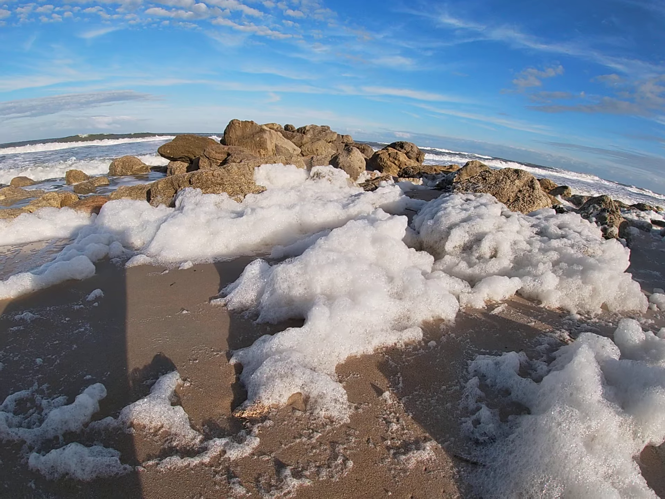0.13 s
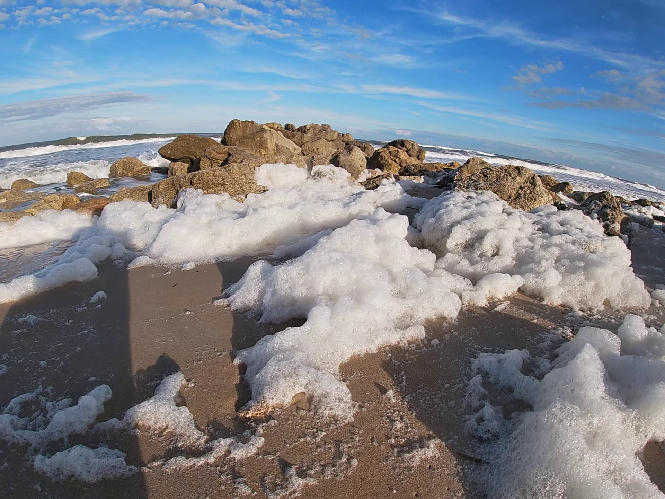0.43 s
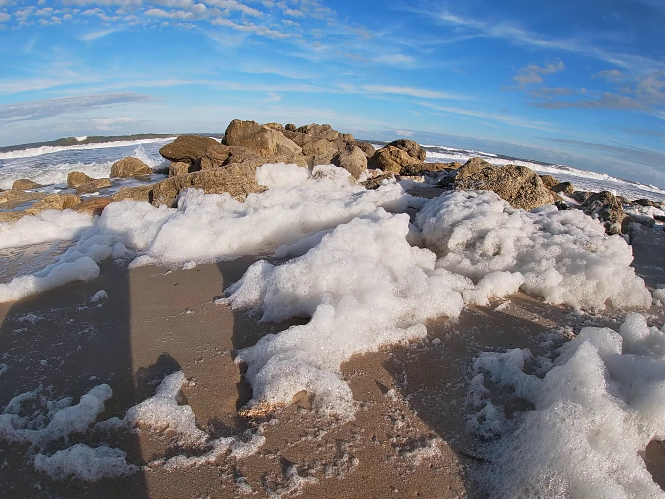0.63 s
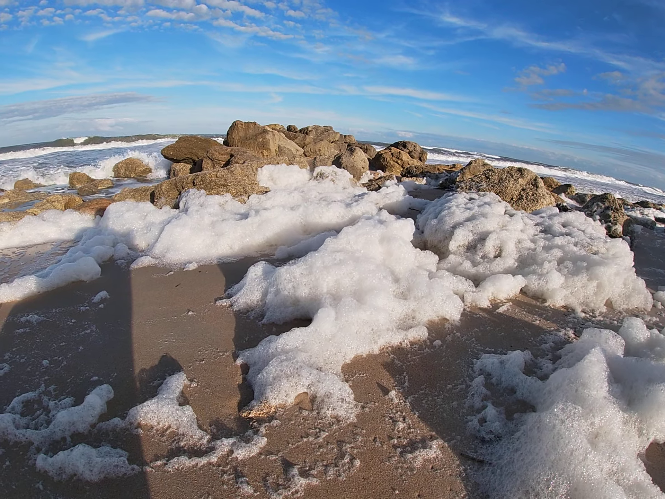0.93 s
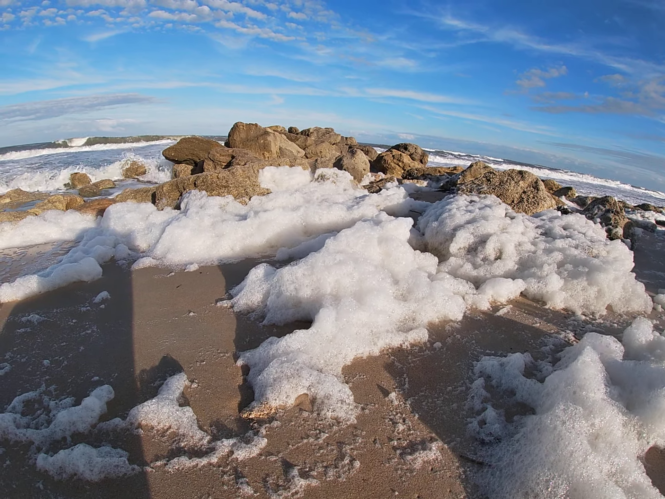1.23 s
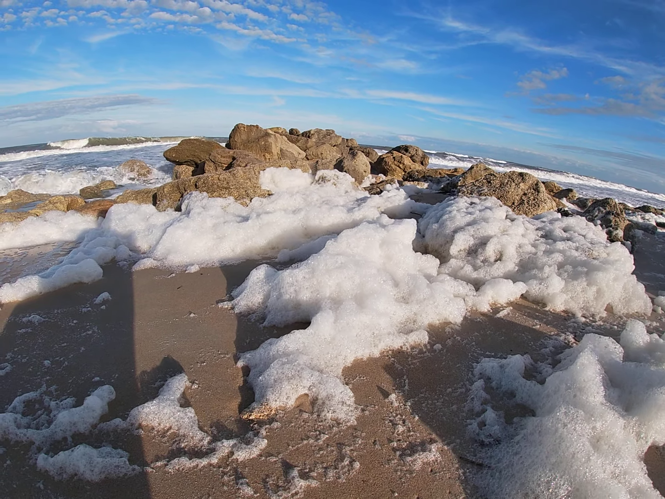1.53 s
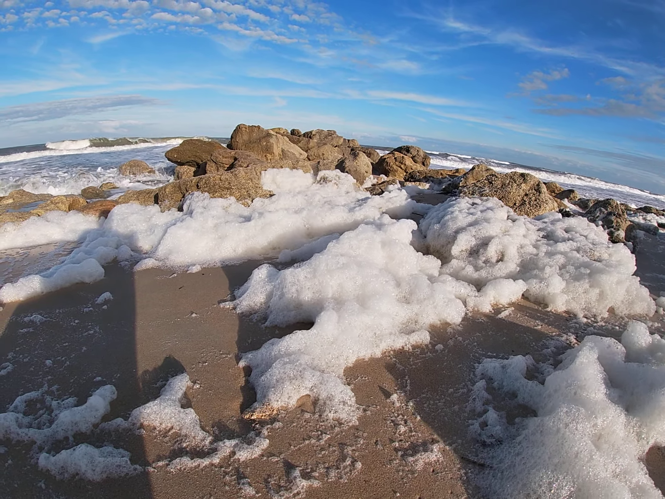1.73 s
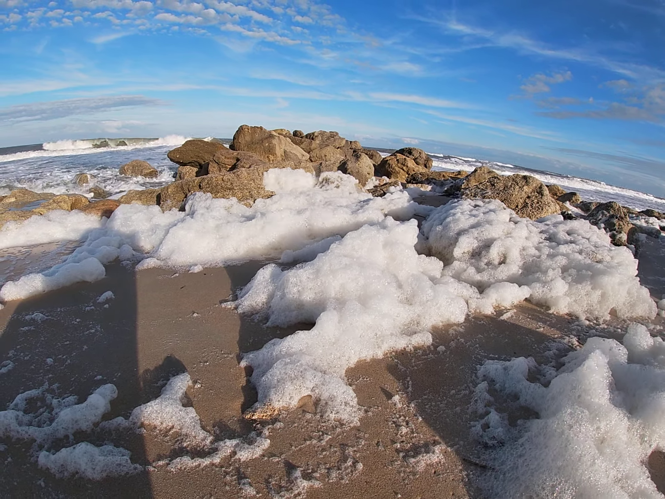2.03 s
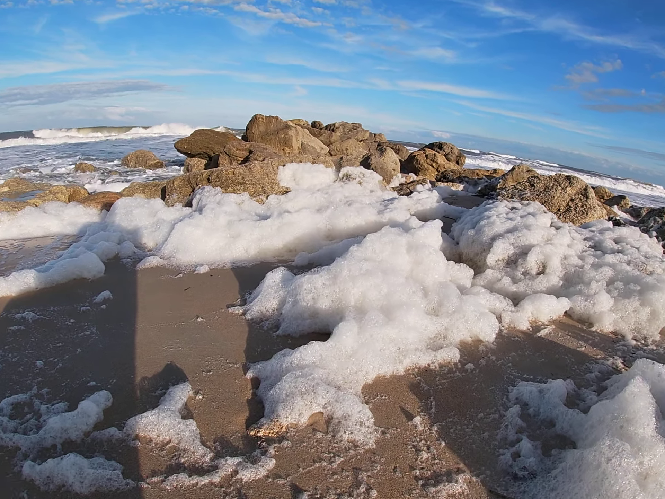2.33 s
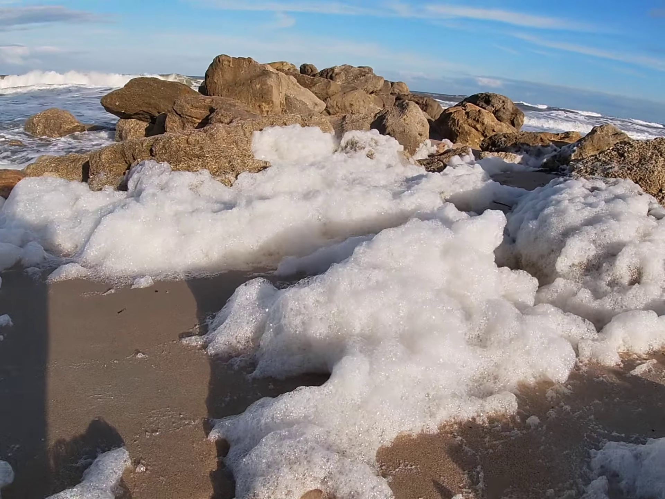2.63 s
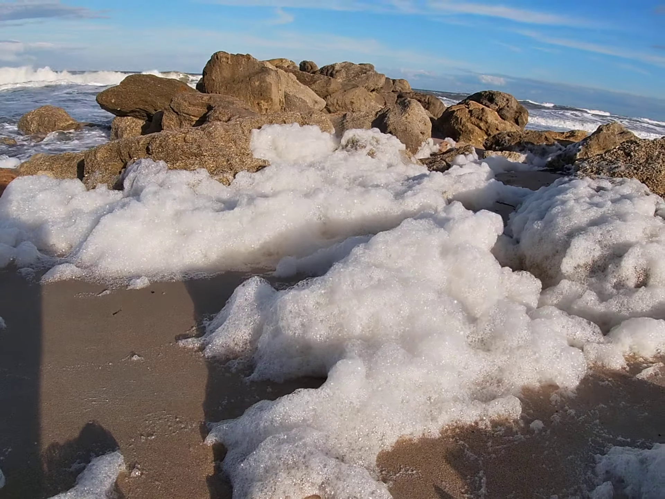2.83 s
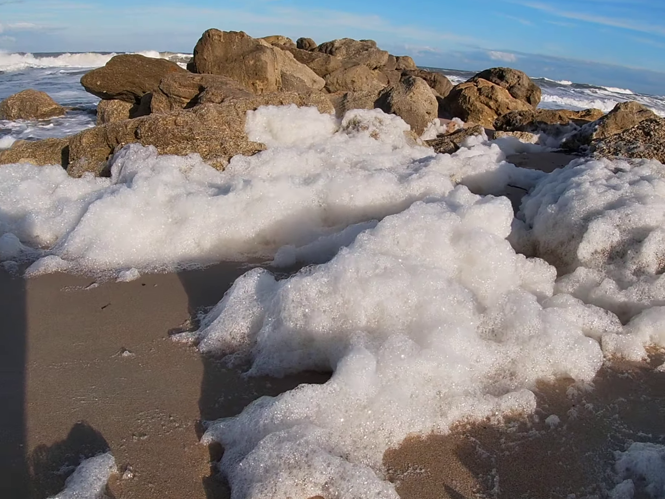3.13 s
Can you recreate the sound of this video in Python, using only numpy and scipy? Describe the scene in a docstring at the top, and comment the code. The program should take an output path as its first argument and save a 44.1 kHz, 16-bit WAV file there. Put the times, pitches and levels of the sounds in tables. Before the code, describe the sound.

Wind rumble and hard thumps on the microphone, with fainter surf hissing over rocks behind.

```python
"""A small camera on a windy beach. From the start, eddies carried over the microphone port make a rumble that
flutters and swells with each gust, and behind it surf over rocks hisses as coloured noise in flickering bands.
Single hard buffets, short swings of pressure, soon strike through. Later a wave spurts up now and then in
brief bursts of narrow-band noise, and a few faint ticks sound in the treble as very short pulses."""
import sys
import numpy as np
from scipy import signal
from scipy.fft import rfft, irfft, next_fast_len
from scipy.io import wavfile
from scipy.ndimage import uniform_filter1d, map_coordinates

SR = 44100
rng = np.random.default_rng(int(sys.argv[2]) if len(sys.argv) > 2 else 0)


def transcribe(signal):
    """Save signal, clipped to [-1, 1], as a 16-bit WAV file at the path in sys.argv[1]."""
    frames = np.atleast_2d(signal).T
    limited = np.clip(frames, -1, 1)
    pcm = np.round(limited * 32767).astype(np.int16)
    wavfile.write(sys.argv[1], SR, pcm)


N = 144648
t = np.arange(N) / SR

# All levels below are those of the sources, ahead of the camera's own stage.
# Gusts on the port. Each row: time in seconds, then the levels in dB of the rumble (nominal, ahead of
# its evening), the small eddies and the finest eddies.
GUST_LEVELS = [(0.02, -21.5, -35.5, -41), (0.06, -34, -24.5, -51), (0.09, -19, -40, -39.5),
               (0.13, -21.5, -27.5, -42.5), (0.32, -29.5, -34.5, -41), (0.35, -22.5, -27.5, -44),
               (0.38, -25.5, -37, -40.5), (0.57, -22, -28, -41.5), (0.63, -16.5, -35.5, -39.5),
               (0.77, -28.5, -37.5, -43), (0.8, -16.5, -27, -52), (0.81, -22.5, -38, -40),
               (1.09, -27.5, -35.5, -41), (1.23, -24.5, -35.5, -41.5), (1.26, -21, -33.5, -36.5),
               (1.48, -15.5, -21.5, -37.5), (1.54, -29.5, -34.5, -44.5), (1.66, -18, -33, -41),
               (1.71, -28.5, -36.5, -43), (1.88, -19.5, -28, -38), (1.91, -34, -27, -33.5),
               (1.93, -26.5, -40.5, -46), (1.95, -19, -32, -40.5), (2.08, -19, -26, -40),
               (2.1, -24.5, -35, -45), (2.15, -35, -28.5, -46), (2.3, -22.5, -33.5, -41),
               (2.34, -21, -24.5, -38.5), (2.36, -20.5, -32.5, -41), (2.47, -25, -24.5, -41),
               (2.68, -20, -28.5, -43.5), (2.73, -24.5, -32, -42.5), (2.99, -22, -25.5, -43.5),
               (3.02, -19, -15, -41), (3.12, -20, -28, -40.5), (3.26, -26, -29.5, -41)]
# Slow heave of the largest eddies. Each row: time in seconds, level in dB.
HEAVE_LEVELS = [(0.02, -34.5), (0.39, -29), (0.98, -40), (1.02, -24), (1.15, -34.5), (1.38, -21.5),
                (1.41, -24.5), (1.81, -30.5), (2.45, -29.5), (2.54, -38), (2.57, -24.5), (3.06, -34.5),
                (3.1, -20.5), (3.26, -32.5)]
# Pressure spectrum of the eddies at mean wind speed. Each row: frequency in Hz, relative density in dB per Hz.
EDDY_SPECTRUM = [(12, -38), (20, -9), (68, -3), (108, -4), (166, -10.5), (195, -9.5), (225, -14),
                 (426, -21), (698, -31), (900, -34), (1170, -65), (1980, -120)]
# Surf. Each row: time in seconds, then the levels in dB of the lower treble, the low band, the middle band,
# the top air and the upper treble.
SURF_LEVELS = [(0.02, -47.5, -45, -45.5, -82, -51), (0.24, -49, -44, -45.5, -78, -50),
               (0.47, -47.5, -44, -44, -75.5, -47.5), (0.67, -48, -47.5, -44, -75.5, -47.5),
               (0.89, -46, -42, -42.5, -74, -46), (1.05, -44.5, -44.5, -42.5, -75.5, -46),
               (1.21, -45.5, -44, -43.5, -78.5, -45.5), (1.32, -42.5, -41, -43, -77, -48),
               (1.44, -46, -43, -46.5, -79, -48), (1.59, -52, -51, -48, -85, -52),
               (1.91, -49.5, -48, -50, -85, -50.5), (2.04, -48.5, -50, -49.5, -85, -50.5),
               (2.15, -49.5, -57.5, -52.5, -84, -51.5), (2.3, -45.5, -52.5, -47.5, -85, -49),
               (2.48, -45.5, -55, -46.5, -84.5, -50.5), (2.74, -47, -50.5, -45.5, -86, -52),
               (2.9, -46.5, -49, -45.5, -84, -51), (3.26, -47.5, -52, -48, -86, -52.5)]
# Colour of the surf through the camera housing. Each row: frequency in Hz, relative density in dB per Hz.
SURF_SPECTRUM = [(410, -22.5), (700, -9), (814, -6), (869, -8), (1010, -1), (1460, -4), (1840, -4.5),
                 (2420, -9.5), (2950, -6.5), (3240, -6), (3700, -9), (4760, -10), (5430, -15.5),
                 (6620, -34), (7400, -43.5), (9000, -41.5), (10500, -47), (12500, -64.5)]
# Highest band centre, in Hz, of the low, middle, lower treble and upper treble; the air lies above.
SURF_BAND_TOPS = [1450, 2400, 3800, 7200]
# Hard buffets. Each row: centre in seconds, envelope peak in dB ahead of the port's low-pass, pitch in Hz,
# cycles between the 1/e points of the envelope.
BUFFET_SWINGS = [(0.141, -22.5, 447, 1.15), (0.164, -16.5, 300, 0.75), (0.188, -21.5, 348, 0.92),
                 (0.571, -16.5, 307, 0.48), (0.603, -23.5, 300, 2), (0.791, -20, 300, 0.63),
                 (1.392, -16, 255, 1.05), (1.475, -9, 382, 1.3), (1.478, -22, 700, 1.3),
                 (1.485, -15, 215, 1.6), (1.504, -22, 299, 0.74), (1.899, -11.5, 207, 2.6),
                 (2.06, -19.5, 546, 0.6), (2.066, -12, 223, 1.1), (2.17, -24.5, 350, 1.1),
                 (2.221, -24.5, 450, 1.17), (2.368, -28, 550, 1), (2.565, -24, 348, 0.73),
                 (3.009, -23, 550, 0.92), (3.0215, -15, 516, 0.71), (3.041, -19, 400, 0.8),
                 (3.0563, -7, 750, 0.34), (3.073, -12, 396, 0.89), (3.088, -14.5, 300, 1.4),
                 (3.11, -15.5, 420, 0.99), (3.1108, -25.5, 1300, 1.1), (3.064, -24, 552, 1.3),
                 (3.172, -19, 250, 1.2), (3.25, -21, 350, 1.16)]
# Spurts of a wave against the rocks. Each row: peak time in seconds, rms level at the peak in dB,
# centre in Hz, time from the peak to 1/e in seconds.
SPURT_BURSTS = [(1.277, -41, 1900, 0.012), (1.337, -38.5, 1000, 0.021), (1.312, -41, 3800, 0.0053),
                (1.331, -38, 4000, 0.0048), (1.353, -36.5, 1900, 0.0076), (1.355, -39.5, 3300, .006),
                (1.382, -33.5, 800, 0.014), (1.385, -32.5, 1470, 0.018), (1.384, -40.5, 3000, 0.012),
                (1.425, -43, 900, 0.0073), (1.434, -45, 3700, 0.013), (1.953, -42, 4000, .004),
                (2.547, -40.5, 1200, 0.0061), (2.818, -40, 900, 0.0065), (2.843, -48, 2900, 0.0058),
                (2.915, -39.5, 1080, .006), (3.024, -38, 1900, .005), (3.039, -38, 1800, 0.005),
                (3.228, -39, 2000, 0.0037)]
# Faint ticks. Each row: time in seconds, pulse peak in dB ahead of the high-pass.
TICK_PULSES = [(1.343, -50), (3.0975, -41), (3.103, -50), (3.1085, -44), (3.114, -47)]

SPEED_FLUTTER, FLUTTER_RATE = 0.08, 60  # rms of log wind speed, changes per second
RUMBLE_FROM_HZ, SMALL_FROM_HZ, FINE_FROM_HZ = 50, 150, 300  # limits between eddy sizes
FLURRY_DB, FLURRY_RATE = 2.2, 110  # rms in dB, changes per second
EVEN_S, EVENNESS = 0.025, 0.36  # averaging time in seconds; 0 leaves the rumble as is, 1 nearly flattens it
SWELL_DB, SWELL_RATE = 0.3, 1.1  # rms in dB, changes per second
FIZZ_DB, FIZZ_RATE = 0.18, 59
FLICKER_DB, FLICKER_RATE = 1.0, 9
PORT_TOP_HZ = 1910
SPURT_SPREAD = 1.33  # ratio of each band limit to the centre
TICK_S, TICK_FROM_HZ = 0.000035, 7000  # time from the peak to 1/e, high-pass corner
CAMERA_TOP_HZ = 12700


def undb(db):
    """Amplitude ratio from its logarithmic level in dB."""
    return 10 ** (np.asarray(db) / 20)


def unit(x):
    """Normalization by the root mean square, which becomes 1."""
    return x / np.sqrt(np.mean(x ** 2))


def column(table, order):
    """Linear interpolation of one column of a table over time."""
    rows = np.array(table, float)
    return np.interp(t, rows[:, 0], rows[:, order])


def walk(rate):
    """Smoothing of white noise by two moving averages: about rate changes a second, rms 1."""
    k = max(int(SR / rate), 2)
    once = uniform_filter1d(rng.standard_normal(N), k)
    return unit(uniform_filter1d(once, k))


def bands(colour, centres, size):
    """Spectral shaping of white noise, split into overlapping bands whose power weights add up to 1."""
    log_f = np.log(np.maximum(np.fft.rfftfreq(size, 1 / SR), 1))
    rows = np.array(colour, float)
    density_db = np.interp(log_f, np.log(rows[:, 0]), rows[:, 1])
    spectrum = rfft(rng.standard_normal(size)) * undb(density_db)
    for hat in np.eye(len(centres)):
        power_share = np.interp(log_f, np.log(centres), hat)
        yield irfft(spectrum * np.sqrt(power_share), size)


def wind():
    """Frozen turbulence: a fixed eddy pattern passes the port at fluttering speed, its finest part in flurries."""
    place = np.cumsum(np.exp(SPEED_FLUTTER * walk(FLUTTER_RATE)))  # distance carried, in samples
    size = next_fast_len(2 * N)
    centres = 30 * 2 ** np.arange(0, 5.1, 0.5)  # half octaves
    deep, rumble, small, fine = 0, 0, 0, 0
    flurry = undb(FLURRY_DB * walk(FLURRY_RATE))
    for hz, band in zip(centres, bands(EDDY_SPECTRUM, centres, size)):
        heard = map_coordinates(band, [place], order=1, mode="wrap")
        if hz < RUMBLE_FROM_HZ:
            deep = deep + heard
        elif hz < SMALL_FROM_HZ:
            rumble = rumble + heard
        elif hz < FINE_FROM_HZ:
            small = small + heard
        else:
            fine = fine + heard * flurry
    # Dividing by a power of the local strength evens the rumble.
    rumble = unit(rumble)
    power = uniform_filter1d(rumble ** 2, int(EVEN_S * SR))
    rumble = rumble / (power + 0.037) ** (EVENNESS / 2)
    out = unit(deep) * undb(column(HEAVE_LEVELS, order=1))
    for order, part in enumerate((rumble, small, fine), start=1):
        out = out + unit(part) * undb(column(GUST_LEVELS, order))
    return out


def surf():
    """Superposition of countless bursting bubbles: noise bands swell and fizz together but flicker alone."""
    centres = 500 * 2 ** np.arange(0, 4.8, 1 / 3)  # third octaves
    shared_db = SWELL_DB * walk(SWELL_RATE) + FIZZ_DB * walk(FIZZ_RATE)
    parts = np.zeros((len(SURF_BAND_TOPS) + 1, N))
    for band, hz in zip(bands(SURF_SPECTRUM, centres, N), centres):
        flicker_db = FLICKER_DB * walk(FLICKER_RATE)
        parts[np.searchsorted(SURF_BAND_TOPS, hz)] += band * undb(shared_db + flicker_db)
    low, middle, treble, upper, air = parts
    out = 0
    for order, part in enumerate((treble, low, middle, air, upper), start=1):
        out = out + unit(part) * undb(column(SURF_LEVELS, order))
    return out


def buffets():
    """Pressure transients: each buffet is a short swing under a bell envelope, low-passed at the port."""
    out = np.zeros(N)
    phases = 2 * np.pi * rng.random(len(BUFFET_SWINGS))
    for (s, db, hz, cycles), phase in zip(BUFFET_SWINGS, phases):
        k = slice(max(int((s - 0.03) * SR), 0), int((s + 0.03) * SR))
        turns = (t[k] - s) * hz
        envelope = np.exp(-np.abs(2 * turns / cycles) ** 1.5)
        out[k] += undb(db) * envelope * np.cos(2 * np.pi * turns + phase)
    return signal.sosfilt(signal.butter(4, PORT_TOP_HZ, fs=SR, output="sos"), out)


def spurts():
    """Band-limited noise bursts: each spurt is noise around its own pitch under a Gaussian envelope."""
    out = 0
    for s, db, hz, length in SPURT_BURSTS:
        limits = [hz / SPURT_SPREAD, hz * SPURT_SPREAD]
        sos = signal.butter(3, limits, "bandpass", fs=SR, output="sos")
        noise = unit(signal.sosfiltfilt(sos, rng.standard_normal(N)))
        envelope = np.exp(-((t - s) / length) ** 2)
        out = out + undb(db) * envelope * noise
    return out


def ticks():
    """Brevity gives a broad spectrum: each tick is a very short Gaussian pulse, thinned by a high-pass."""
    out = sum(undb(db) * np.exp(-((t - s) / TICK_S) ** 2) for s, db in TICK_PULSES)
    return signal.sosfilt(signal.butter(2, TICK_FROM_HZ, "highpass", fs=SR, output="sos"), out)


def scene():
    """Superposition of the pressures of wind, surf, buffets, spurts and ticks in one channel."""
    return (wind() + surf() + buffets() + spurts() + ticks())[None]


def record(dry):
    """Saturation and band limiting: the camera rounds the loudest buffets and cuts the top."""
    rounded = np.tanh(1.596 * dry) / 1.535
    return signal.sosfilt(signal.ellip(8, 0.2, 70, CAMERA_TOP_HZ, fs=SR, output="sos"), rounded)


dry = scene()
out = record(dry)
transcribe(out)
```